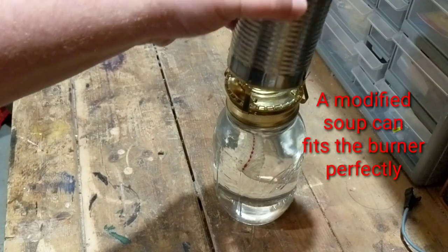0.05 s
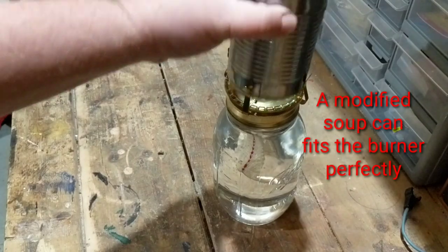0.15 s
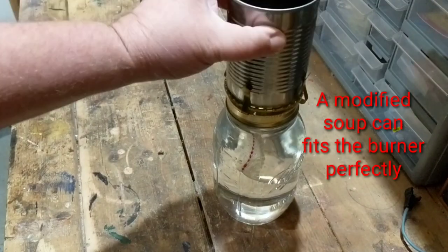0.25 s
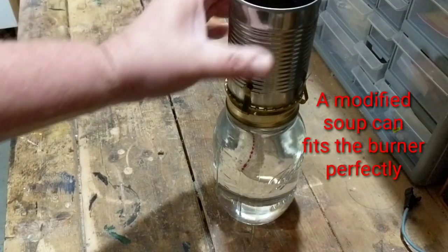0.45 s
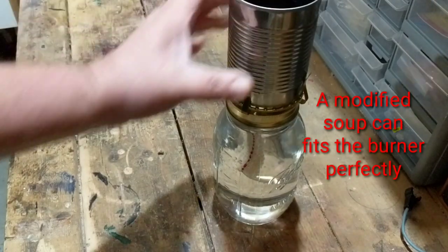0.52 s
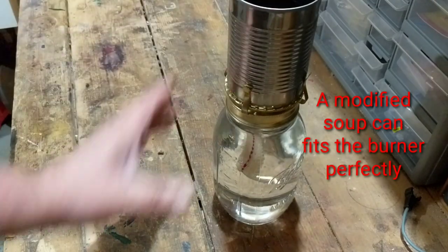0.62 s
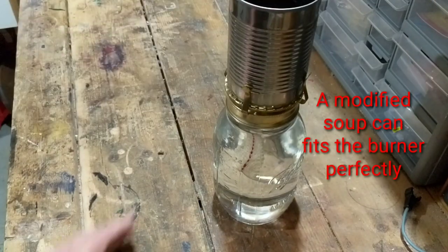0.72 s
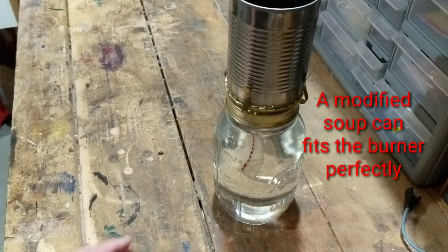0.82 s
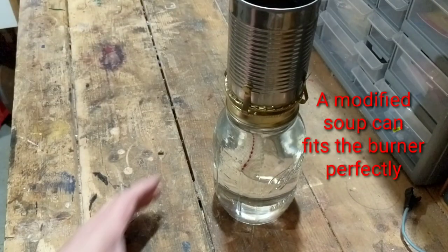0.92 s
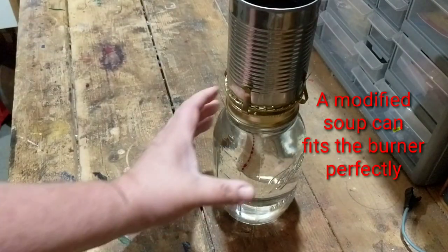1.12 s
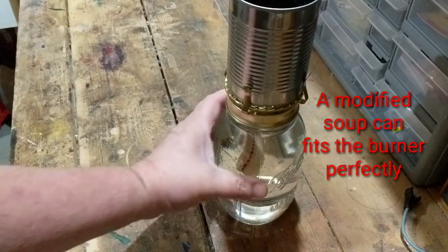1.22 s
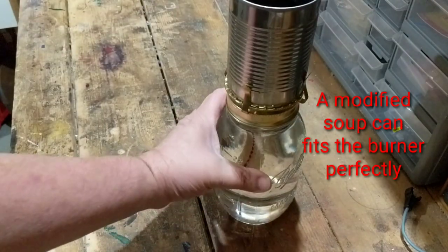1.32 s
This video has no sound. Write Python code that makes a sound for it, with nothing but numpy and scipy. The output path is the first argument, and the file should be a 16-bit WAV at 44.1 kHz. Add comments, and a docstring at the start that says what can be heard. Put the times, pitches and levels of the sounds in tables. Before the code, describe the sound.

A metal can ticks twice on a brass burner, then seats with a sharp clack.

```python
"""A tin can is lowered onto the brass burner of a jar lamp in a quiet workshop.
Its rim ticks twice on the burner's prongs, scrapes and judders down by friction, and seats with a
rattling clack as quick impacts excite the can's modes. The push passes through the jar and thumps
the wooden bench, which sways at its low resonances. The metal sounds reverberate briefly in the
room; low rumble and faint hiss lie under it all."""
import sys
import numpy as np
from scipy import signal
from scipy.fft import rfft, irfft, next_fast_len
from scipy.io import wavfile
from scipy.ndimage import map_coordinates

SR = 44100
rng = np.random.default_rng(int(sys.argv[2]) if len(sys.argv) > 2 else 0)


def transcribe(u):
    """Save the signal u as a 16-bit wav file named by the first command-line argument.

    u: samples, shape (n,) or (channels, n), limited to [-1, 1]; the rate is SR.
    q: integer samples, one column per channel.
    """
    v = np.clip(np.atleast_2d(u).T, -1, 1)
    q = np.round(v * 32767).astype(np.int16)
    wavfile.write(sys.argv[1], SR, q)


N = 59535


def amp(db):
    """Amplitude ratio of a level in decibels."""
    return 10 ** (np.asarray(db) / 20)


def unit(x):
    """Normalisation to rms 1."""
    return x / np.sqrt(np.mean(x ** 2) + 1e-20)


def along(points, hz):
    """Interpolation of (frequency_hz, value) points on a logarithmic frequency axis."""
    f, v = np.transpose(points)
    return np.interp(np.log(hz + 1), np.log(f + 1), v)


def clock():
    """Time of each sample in seconds."""
    return np.arange(N) / SR


def level(points):
    """Amplitude envelope through (time_s, level_db) points."""
    return amp(np.interp(clock(), *np.transpose(points)))


def wobble(rate_hz):
    """Smooth random modulation: a spline through rate_hz Gaussian values a second."""
    return map_coordinates(rng.standard_normal(N // 8), [clock() * rate_hz + 2], mode="wrap")


def filtered(x, response):
    """Linear filtering: the spectrum of x is multiplied by a frequency response."""
    size = next_fast_len(N + 8192)
    return irfft(rfft(x, size) * response(np.fft.rfftfreq(size, 1 / SR)), size)[:N]


def noise(response):
    """White noise shaped by a frequency response, at rms 1."""
    return unit(filtered(rng.standard_normal(N), response))


def coloured(points):
    """Noise whose relative spectral density follows (frequency_hz, density_db) points."""
    return noise(lambda f: amp(along(points, f)))


def band(hz, octaves):
    """Band noise with a Gaussian response in log frequency."""
    return noise(lambda f: np.exp(-.5 * (np.log2((f + 1) / hz) / octaves) ** 2))


def struck(start, attack, t60):
    """Impact envelope: a quick rise, then exponential decay of 60 dB in t60 seconds."""
    age = np.maximum(clock() - start, 0)
    return (1 - np.exp(-age / attack)) * np.exp(-np.log(1000) * age / t60)


def mode(start, hz, attack, t60, phase=0):
    """Free vibration of one struck mode: a damped sinusoid, its phase in cycles."""
    return struck(start, attack, t60) * np.sin(2 * np.pi * (hz * (clock() - start) + phase))


def workshop_rumble():
    """Ambient noise: a steady broadband floor under a low rumble that swells and sinks."""
    # frequency_hz, density_db
    floor_spectrum = [(25, -17), (62, 1.5), (120, -1.5), (200, -13), (260, -12), (310, -9), (480, -18),
                      (720, -19.5), (1100, -21), (2000, -22.5), (3600, -25), (5000, -28.5), (8760, -28.5),
                      (10300, -39), (14800, -45.5), (15500, -46)]
    rumble_spectrum = [(25, -33), (70, -4), (120, 2), (190, -5), (260, -15.5), (420, -11.5), (700, -22.5),
                       (1500, -46)]
    # time_s, level_db
    rumble_levels = [(0, -62), (.45, -61.5), (.62, -58), (.7, -68.5), (.82, -54.5), (1.0, -60.5),
                     (1.22, -62), (1.34, -55)]
    return amp(db=-58) * coloured(floor_spectrum) + level(rumble_levels) * coloured(rumble_spectrum)


def workshop_hiss():
    """Amplitude-modulated noise: narrow bands waver, and faint high swishes come and go."""
    # centre_hz, width_octaves, level_db, wander_db
    narrow_bands = [(854, 0.085, -73.5, 1.5), (2684, 0.04, -78.5, -3.9)]
    # time_s, level_db
    high_band_levels = [(0, -68.5), (.42, -69), (.53, -67), (.65, -71.5), (.73, -70.5), (.78, -71),
                        (.85, -69), (.97, -66.5), (1.03, -69.5), (1.27, -72), (1.33, -65)]
    # peak_s, half_width_s, level_db
    swishes = [(0.501, 0.026, -64.5), (0.831, 0.027, -67), (0.936, 0.047, -67), (1.14, 0.12, -73),
               (1.33, 0.041, -75.5)]
    # frequency_hz, density_db
    swish_spectrum = [(2500, -9), (5500, -13), (8300, 4), (9300, -2), (11000, -19), (15000, -33)]
    hiss = sum(amp(db + wander_db * wobble(rate_hz=12.86)) * band(hz, octaves)
               for hz, octaves, db, wander_db in narrow_bands)
    hiss += level(high_band_levels) * band(hz=4276, octaves=0.1)
    swell = sum(amp(db) * np.exp(-((clock() - peak) / width) ** 2) for peak, width, db in swishes)
    return hiss + swell * coloured(swish_spectrum)


def pressing():
    """Structure-borne sound: dull rubbing passes down through the jar as the can is pushed home."""
    # time_s, level_db
    push_levels = [(0, -60), (.13, -57.5), (.2, -59.5), (.24, -48), (.265, -50), (.31, -50.5), (.36, -60.5),
                   (.42, -74)]
    # frequency_hz, density_db
    jar_spectrum = [(40, -3.5), (110, -1), (200, -4.5), (330, -8.5), (600, -12.5), (1000, -20.5),
                    (2500, -44.5)]
    return level(push_levels) * coloured(jar_spectrum)


def scrape():
    """Sliding friction: the can rubs down the prongs in short strokes of grainy band noise."""
    # start_s, length_s, level_db, centre_hz, width_octaves
    strokes = [(0.12, 0.025, -63, 8200, 0.18), (0.22, 0.024, -57.5, 7860, 0.18),
               (0.2309, 0.017, -51.5, 1940, 0.24), (0.225, 0.047, -58, 4170, 0.34),
               (.256, 0.0081, -46.5, 1450, 0.36), (0.254, 0.0094, -48.5, 7600, 0.33)]
    edge_s, grain_db = 0.0058, -0.5
    t, out = clock(), np.zeros(N)
    for start, length, db, hz, octaves in strokes:
        rise = np.clip((t - start) / edge_s, 0, 1)
        release = np.exp(-np.maximum(t - start - length, 0) / edge_s)
        friction = band(hz, octaves) * amp(grain_db * wobble(rate_hz=400))
        out += amp(db) * rise * release * unit(friction)
    return out


def rim_ticks():
    """Impact excitation: each touch of the rim gives a broadband click and rings one prong's modes."""
    # start_s, level_db, attack_s, click_t60_s, ring_gain_db, edge_gain_db
    touches = [(0.1312, -45.5, 0.00064, 0.081, -2.5, -10), (0.1965, -45.5, 0.00054, 0.078, -2, -6)]
    # the click's body and its sharp edge: frequency_hz, density_db
    body_spectrum = [(700, -24), (1900, -3.5), (3600, -7.5), (6000, -5), (7800, 5.5), (9100, -8),
                     (9900, -12), (15000, -32)]
    edge_spectrum = [(3000, -20), (8000, 1), (11500, -18), (12500, -16), (15000, -17)]
    # one list of modes per prong: pitch_hz, gain_db, t60_s
    prongs = [
        [(1835, 0, 0.045), (1944, -2, 0.053), (2050, -6, 0.078), (5480, -2, 0.036), (5700, -1, 0.042),
         (7620, -0.5, 0.099), (7470, -3, .07), (7830, -13.5, 0.14), (8650, -10, 0.13), (9350, -8.5, 0.12)],
        [(2217, -1.5, 0.048), (2836, -4, 0.074), (3670, -2.5, 0.056), (5130, 2, 0.026), (6160, -3, .05),
         (6450, 4, 0.056), (7840, -4, .06), (8240, -14, 0.051), (8760, -10, 0.31), (11500, -10.5, .08)],
    ]
    out = np.zeros(N)
    for (start, db, attack, click_t60, ring_db, edge_db), modes in zip(touches, prongs):
        click = noise(lambda f: np.hypot(amp(along(body_spectrum, f)),
                                         amp(edge_db + along(edge_spectrum, f))))
        ring = sum(amp(mode_db) * mode(start, hz, attack, t60, phase=rng.random())
                   for hz, mode_db, t60 in modes)
        out += amp(db) * (struck(start, attack, click_t60) * click + amp(ring_db) * ring)
    return out


def reverberation(x):
    """Convolution with the room's diffuse tail, in which each frequency decays at its own rate."""
    # frequency_hz, t60_s
    decay_times = [(100, 0.62), (1000, 0.13), (4000, 0.24), (9000, 0.22), (15000, 0.13)]
    hz, t, spectra = signal.stft(rng.standard_normal(SR // 2), SR, nperseg=256)
    decay = np.exp(-np.log(1000) * t / along(decay_times, hz)[:, None])
    _, tail = signal.istft(spectra * decay, SR, nperseg=256)
    return signal.fftconvolve(x, tail / np.linalg.norm(tail))[:N]


def judder():
    """Friction-induced vibration: the can gives a swelling, unsteady tone just before it seats."""
    # time_s, level_db
    swell = [(.232, -69), (.24, -57), (.26, -47), (.268, -51), (.28, -79)]
    pitch_hz, wander_cycles = 828, 0.096
    t = clock()
    sliding = (t > swell[0][0]) & (t < swell[-1][0])
    cycles = pitch_hz * t + wander_cycles * wobble(rate_hz=247.1)
    return sliding * level(swell) * unit(np.sin(2 * np.pi * cycles))


def clack():
    """Repeated impact: each contact of the landing rim adds energy to the hand-damped can's modes."""
    # start_s, level_db, tilt_db_per_octave
    contacts = [(.2662, -31, -3), (0.269, -32, 0), (0.273, -34.5, -1.6), (0.2872, -39, -6.5)]
    # the densely packed modes of thin sheet metal: frequency_hz, density_db
    sheet_spectrum = [(300, -6.5), (600, -13.5), (1000, -6.5), (1600, 2), (2200, -10), (3400, 1.5),
                      (5300, -3), (7000, -4.5), (8900, 6.5), (9900, -4), (10500, -14.5), (11400, -15),
                      (15000, -26)]
    # pitch_hz, gain_db, free_t60_s
    can_modes = [(822, -10, .11), (1271, -1, .1), (1454, -4, .1), (1694, 1, .1), (1842, -1, .1),
                 (2245, -11, .14), (2510, -9, .15), (2702, -7, .13), (3112, -1, .12), (3531, -7, .13),
                 (3630, -3, .11), (4156, -9, .13), (6045, -8, .11), (6696, -3, .12), (6895, -2, .11),
                 (8400, -3, .11), (8623, -2, .12), (8694, -1, .135), (8943, -4, .135)]
    attack_s, crash_t60_s, pivot_hz, ring_db = 0.00068, 0.063, 3500, -11.5
    damped_ratio = 0.69  # the hand shortens each free decay to this fraction
    lowest_hz = sheet_spectrum[0][0]
    crash, ring = np.zeros(N), np.zeros(N)
    for start, db, tilt in contacts:
        sheet = noise(lambda f: amp(along(sheet_spectrum, f)
                                    + tilt * np.log2(np.maximum(f, lowest_hz) / pivot_hz)))
        crash += amp(db) * struck(start, attack_s, crash_t60_s) * sheet
    for hz, mode_db, free_t60 in can_modes:
        energy = sum((amp(db) * struck(start, attack_s, free_t60 * damped_ratio)) ** 2
                     for start, db, _ in contacts)
        ring += amp(mode_db) * np.sqrt(energy) * np.sin(2 * np.pi * (hz * clock() + rng.random()))
    return crash + amp(ring_db) * ring


def bench_thump():
    """Resonance: struck by the jar, the bench's low modes build up and fade."""
    # pitch_hz, gain_db, t60_s
    bench_modes = [(107.5, -0.5, .38), (138.2, 2, 0.21), (164.7, 0, 0.2), (193.3, -0.5, 0.27),
                   (273.2, -15, 0.28), (313.5, -10.5, 0.3), (376.2, -9.5, 0.17), (472, -14, 0.24)]
    start_s, level_db, rise_cycles = 0.267, -34, 1.8
    return amp(level_db) * sum(amp(db) * mode(start_s, hz, rise_cycles / hz, t60, phase=k / 2)
                               for k, (hz, db, t60) in enumerate(bench_modes))


def jar_knock():
    """Heavy damping: the jar's modes die quickly as it meets the bench, leaving a dull knock."""
    # pitch_hz, gain_db, t60_s
    jar_modes = [(290.5, -6.5, 0.16), (355.4, -0.5, 0.077), (406, 0, 0.033), (506, -8.5, 0.048)]
    start_s, level_db, attack_s = 0.2675, -35.5, 0.00063
    return amp(level_db) * sum(amp(db) * mode(start_s, hz, attack_s, t60) for hz, db, t60 in jar_modes)


def bench_sway():
    """Damped free oscillation: the bench sways at very low frequencies after the blow."""
    # start_s, level_db, pitch_hz, t60_s
    sways = [(.318, -44.5, 58.3, 0.68), (0.326, -44, 36, 0.23), (0.344, -39.5, 83.3, 0.17),
             (0.384, -33.5, 68.6, 0.088)]
    attack_s = 0.0052
    return sum(amp(db) * mode(start, hz, attack_s, t60) for start, db, hz, t60 in sways)


def scene():
    """Superposition of the metal and its reverberation, the jar and bench, and the ambient noise."""
    metal = rim_ticks() + scrape() + judder() + clack()
    tail = amp(db=-9.5) * reverberation(metal)
    jar_and_bench = pressing() + bench_thump() + jar_knock() + bench_sway()
    ambience = workshop_rumble() + workshop_hiss()
    return (metal + tail + jar_and_bench + ambience)[None]


def record(dry):
    """Band limiting: an ideal low-pass filter removes the highest treble."""
    cutoff_hz = 15500
    return np.array([filtered(x, lambda f: f < cutoff_hz) for x in dry])


dry = scene()
out = record(dry)
transcribe(out)
```